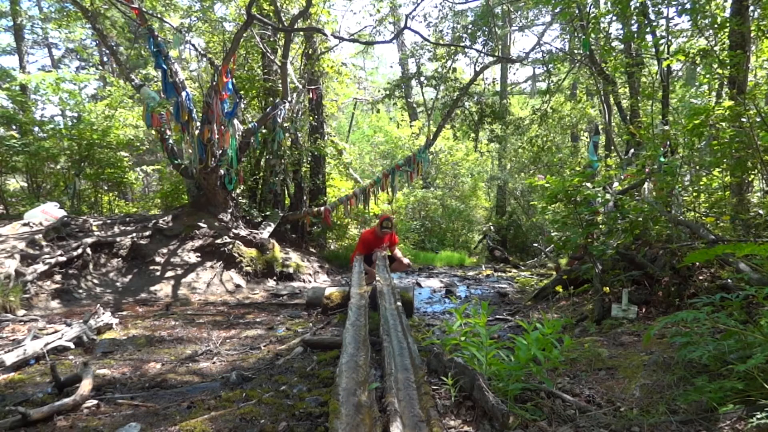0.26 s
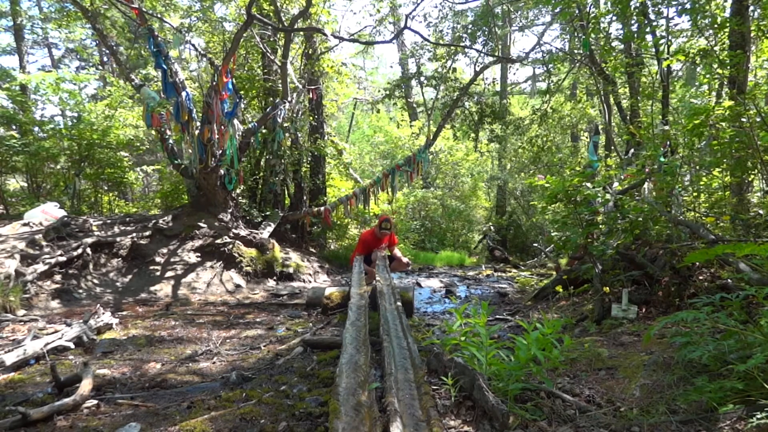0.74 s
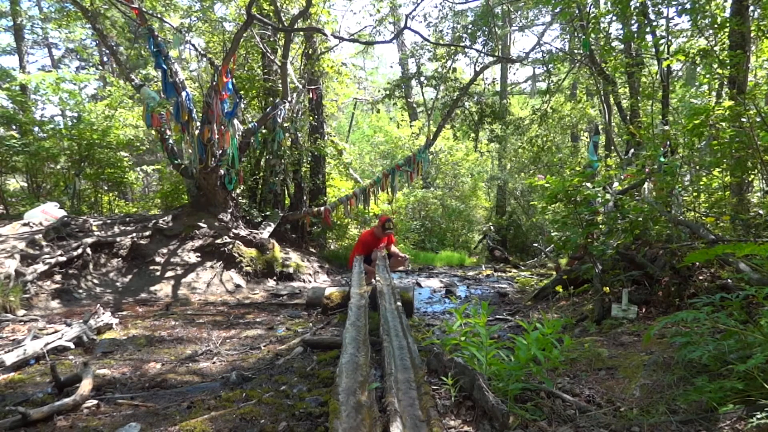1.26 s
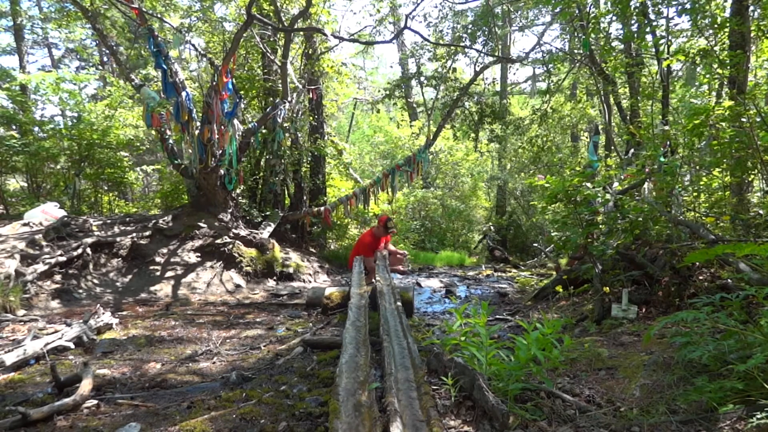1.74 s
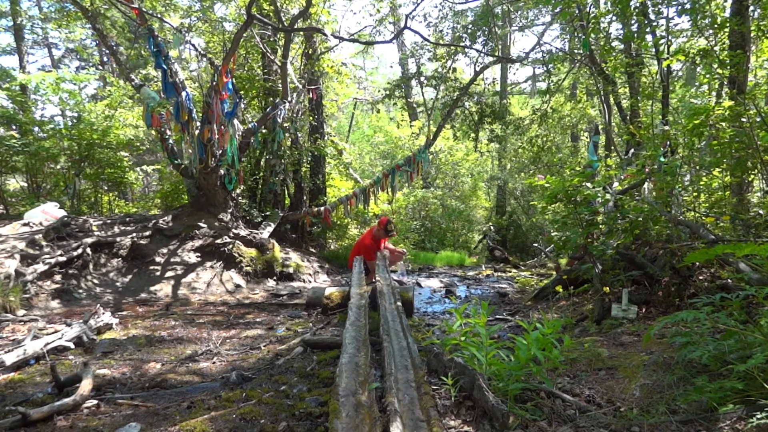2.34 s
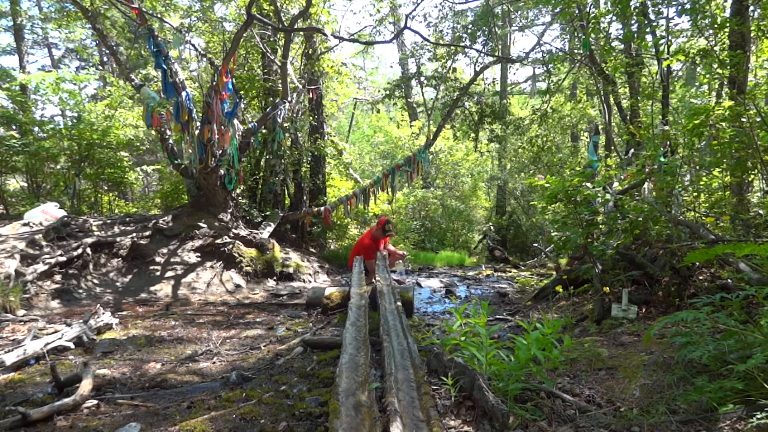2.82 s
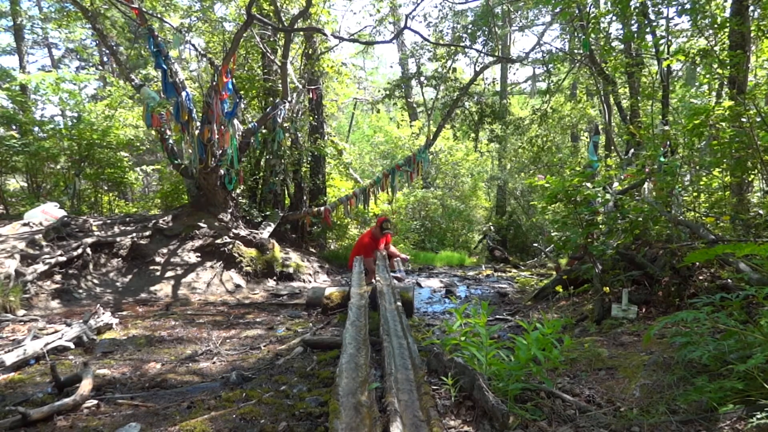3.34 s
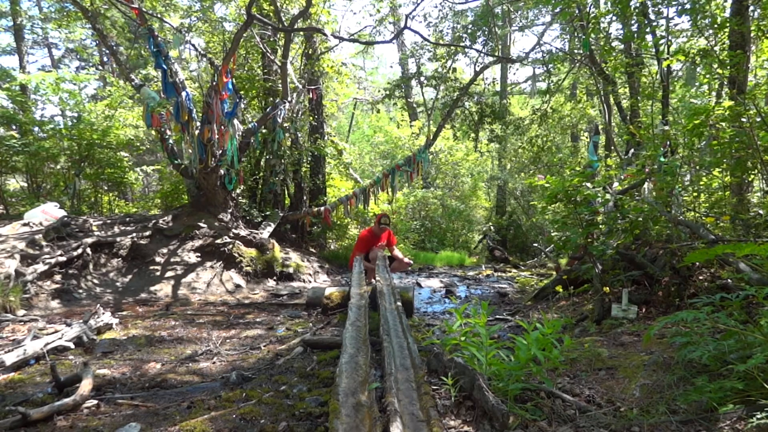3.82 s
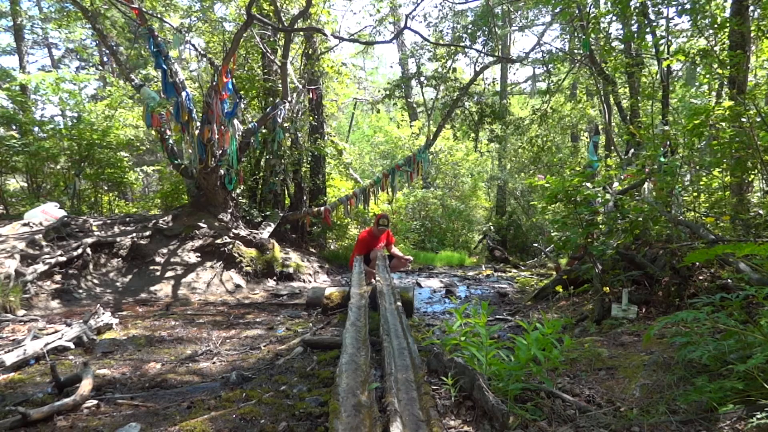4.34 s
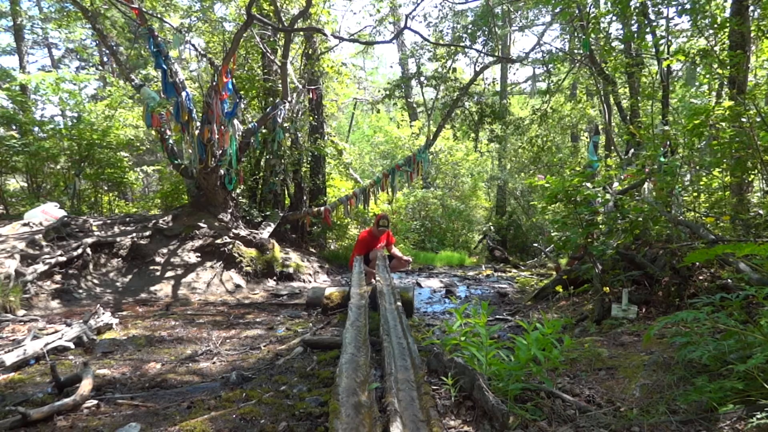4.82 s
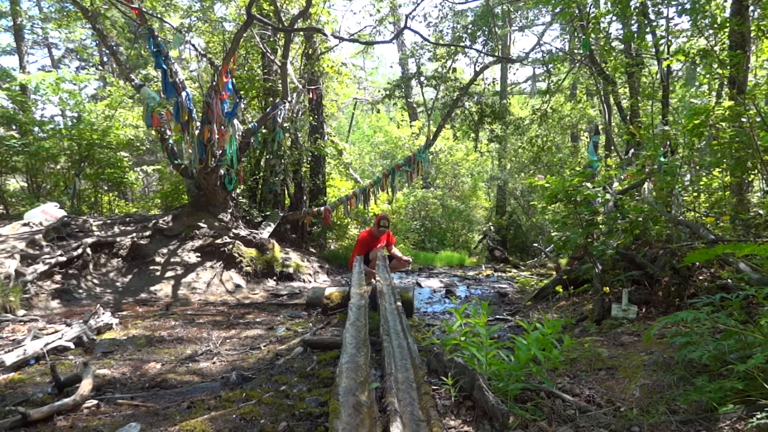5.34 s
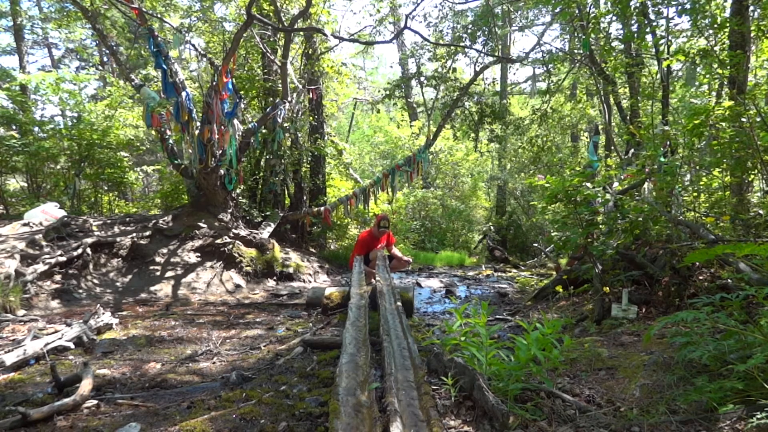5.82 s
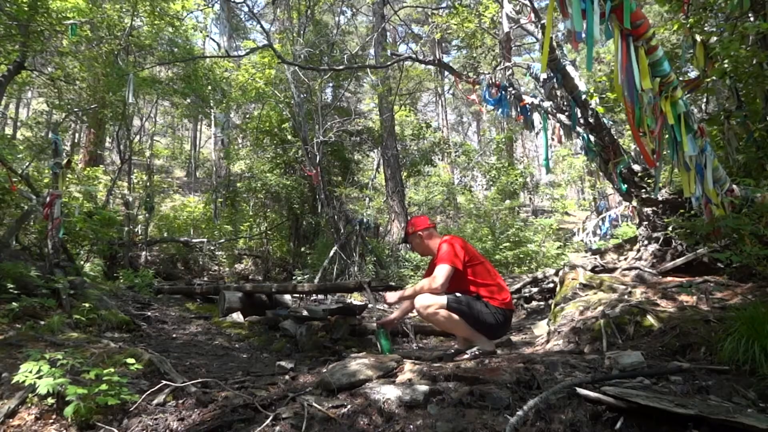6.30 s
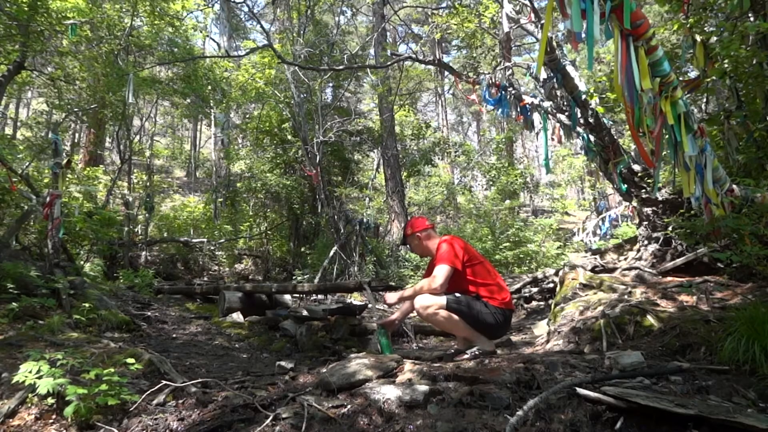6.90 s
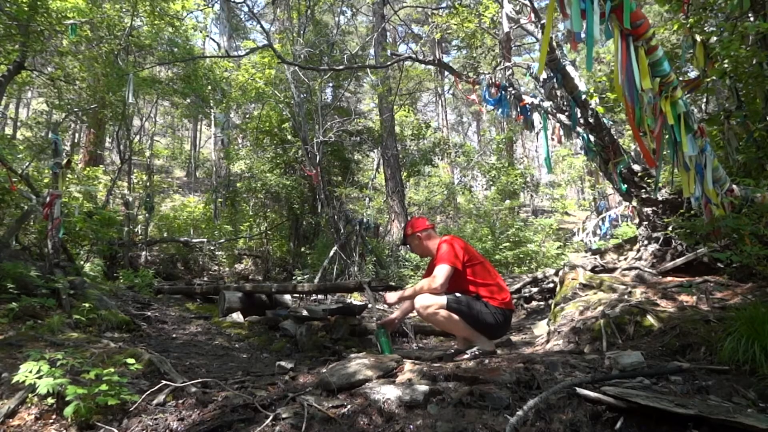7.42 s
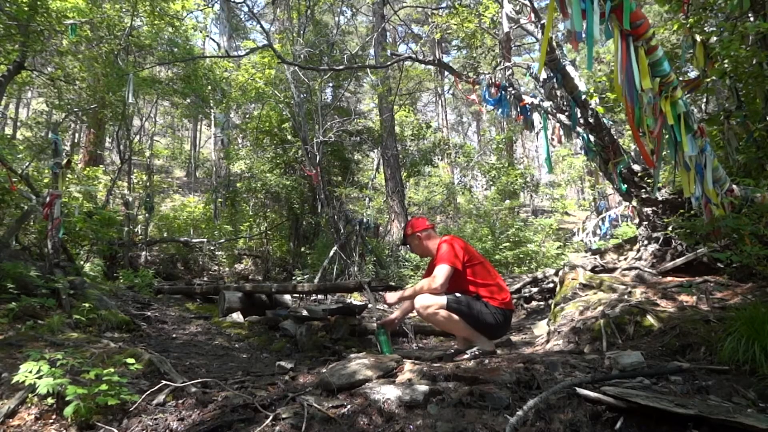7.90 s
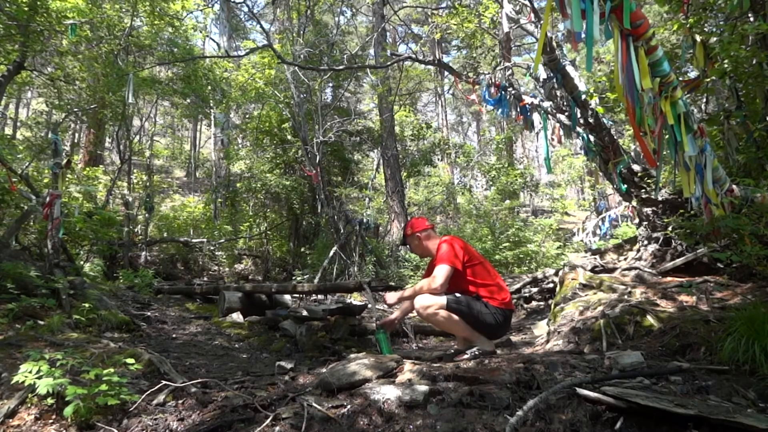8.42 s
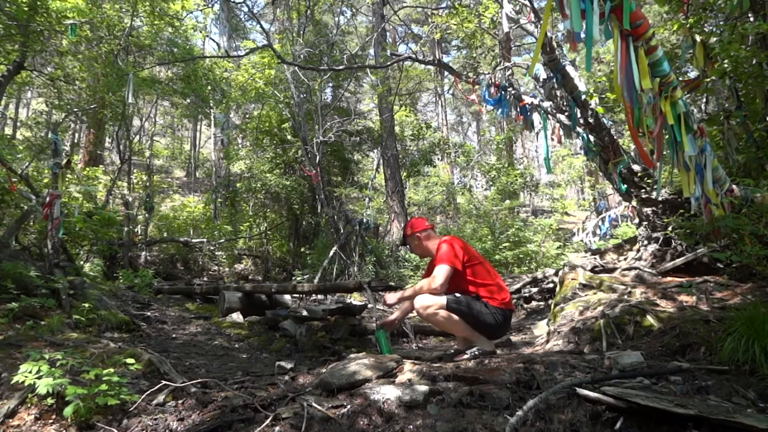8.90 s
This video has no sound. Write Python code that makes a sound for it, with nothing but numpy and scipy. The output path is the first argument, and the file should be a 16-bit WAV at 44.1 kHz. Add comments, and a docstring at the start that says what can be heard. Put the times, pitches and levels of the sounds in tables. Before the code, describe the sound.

A small forest spring trickles over stones a few steps away, with bubbling plinks, little splashes and ticking droplets, gurgling deeper for a while early on. Around six seconds the microphone is abruptly close: the water turns louder and denser, with crisp plops, and a thin stream fills a bottle with a faint hollow rising tone. Very faint low forest air lies beneath.

```python
"""A forest spring trickles over stones, at first a few steps away, gurgling more deeply from 1.4 to 4 s.
Trapped air bubbles ring as short swelling sines over a fine noise spray; drops slap with a pulse, a crack
and a patter, and tiny droplets tick. At 6.05 s the water is suddenly heard close by, louder and denser.
From then on a thin stream catches a bottle in spells, and from 8.4 s runs in steadily: a hollow band of
noise whose note climbs overall. A faint low rush of forest air lies beneath, swelling once after 1.5 s."""
import sys
import numpy as np
from scipy import signal
from scipy.fft import rfft, irfft, next_fast_len
from scipy.io import wavfile

SR = 44100
rng = np.random.default_rng(int(sys.argv[2]) if len(sys.argv) > 2 else 0)


def digitize_waveform(pressure):
    """Quantize a signal to 16-bit integers and store it at the path in sys.argv[1].

    Rows of a 2-D input are taken as channels; values are limited to [-1, 1].
    """
    field = np.atleast_2d(pressure).T
    bounded = np.clip(field, -1, 1)
    quanta = np.round(bounded * 32767).astype(np.int16)
    wavfile.write(sys.argv[1], SR, quanta)


N = 403505

# Swell and slackening of the flow. Each row: time in seconds, level change in dB.
FLOW = [(0, 2.5), (0.33, 0.3), (0.6, 1), (0.87, 1.5), (1.37, -1), (1.41, 1), (1.65, 1), (2.25, 0),
        (2.45, 2), (2.6, 0.3), (2.85, 1.7), (3.1, 1.2), (3.79, -0.2), (4.0, 1.2), (4.25, 0.5), (4.8, 1.5),
        (5.46, 0.3), (5.52, 1.3), (5.64, -0.3), (5.9, 1.2), (6.1, 0.07), (9.15, -0.17)]
# Tone of the water from afar, from afar while it gurgles deeply, and close by.
# Each row: frequency in Hz, relative gain in dB.
FAR_COLOUR = [(110, -40), (200, -17), (320, -13), (440, -10), (510, -8), (620, -3), (760, -7.5),
              (1080, -2.5), (1400, 1), (2200, 2), (2900, 4), (4800, 5), (7000, 4.5), (11000, 1)]
DEEP_COLOUR = [(110, -42.5), (200, -15), (315, -13.5), (400, -1.5), (510, -6), (600, -0.5), (830, -3.5),
               (1400, 5), (2000, 5), (3200, 4.5), (5000, 2.5), (11000, -1.5)]
NEAR_COLOUR = [(130, -29), (250, -15.5), (400, -11), (500, -12), (570, -7), (680, -3), (1060, -7.5),
               (1700, -5), (2400, -8), (3100, -6), (4700, -9.5), (6500, -10.5), (11000, -14.5)]
# Stretches of far, deeply gurgling and near water. Each row: start in seconds, end in seconds.
FAR_SPANS = [(0, 1.39), (4.03, 6.05)]
DEEP_SPANS = [(1.39, 4.03)]
NEAR_SPANS = [(6.05, 10)]
# Stereo width from afar, where more of the sound is scattered, and close by.
# Each row: frequency in Hz, gain on the side signal in dB.
FAR_WIDTH = [(50, -11), (190, -1.5), (620, -3), (1120, -3), (2000, -9.5), (3600, -11), (10000, -10.5)]
NEAR_WIDTH = [(190, -14), (350, -2.5), (620, -6.5), (1120, -8.5), (2000, -11), (3600, -12), (10000, -11)]
# Band levels before flow and wander: (gurgle dB, babble dB, spray dB)
FAR_DB, DEEP_DB, NEAR_DB = (-61.5, -53.4, -49.9), (-58, -51, -47.5), (-55, -45.5, -42.5)


def trickle():
    """Water comes in small surges that shed bubbles and spray; distance blurs the single blips."""
    surge = from_db(1.2 * drift(14) + 2.2 * drift(80))
    blips = swarm(per_s=2800, size_db=3.0, swell_cycles=1.86, surge=surge)
    spray = rng.standard_normal((2, N)) * surge ** 0.52
    spray = coloured(spray, [(300, 3.2), (1500, 4.2), (4000, 8.4), (9000, 8.7)])
    blurred = banks(blips, t60=0.088, wet_db=-2.5)
    far_mid, far_side = blurred + from_db(-1.0) * spray
    far = from_afar(stereo(far_mid, far_side, FAR_WIDTH))
    near_mid, near_side = blips + from_db(-0.5) * spray
    near = stereo(near_mid, near_side, NEAR_WIDTH)
    flow_db, = in_time(FLOW)
    out = 0
    for water, colour, spans, levels_db in ((far, FAR_COLOUR, FAR_SPANS, FAR_DB),
                                            (far, DEEP_COLOUR, DEEP_SPANS, DEEP_DB),
                                            (near, NEAR_COLOUR, NEAR_SPANS, NEAR_DB)):
        heard = during(spans)
        bands = gurgle_babble_spray(coloured(water, colour))
        # every band follows the flow and wanders a little on its own
        for band, db, wander_db in zip(bands, levels_db, (.45, .3, .3)):
            level = from_db(db + flow_db + wander_db * drift(10))
            out = out + heard * level * rms_one(band)
    return out


def gurgle_babble_spray(water):
    """Big, middling and small bubbles fall in three bands, split at 900 and 3500 Hz."""
    below_900, below_3500 = [
        signal.sosfiltfilt(signal.butter(4, hz, fs=SR, output="sos"), water) for hz in (900, 3500)]
    return below_900, below_3500 - below_900, water - below_3500


def swarm(per_s, size_db, swell_cycles, surge, count=56):
    """Countless bubbles, even in power per Hz, small ones more often; each has its own place: (mid, side)."""
    out, pitches = np.zeros((2, N)), np.geomspace(200, 11500, count)
    share = pitches ** .7 / np.sum(pitches ** .7)
    chance = np.cumsum(surge) / np.sum(surge)  # more bubbles in a strong surge
    for hz, part in zip(pitches, share):
        bubbles = int(per_s * part * N / SR) + 2
        when, size, sign, place = rng.random((3000, 4))[:bubbles].T
        height = from_db(size_db * np.minimum(-np.log(1 - size), 2.4)) * np.sign(sign - .5)
        blip = bubble(hz, swell_time(hz, swell_cycles), rise=.025)
        height = height * np.sqrt(hz / np.sum(height ** 2) / np.sum(blip ** 2))
        where = (np.searchsorted(chance, when)[:, None] + np.arange(len(blip))).ravel()
        for k, weight in enumerate((height, height * (2 * place - 1))):
            out[k] += np.bincount(where, np.outer(weight, blip).ravel(), N)[:N]
    return rms_one(out)


# Reflections off the ground and stones. Each row: delay in seconds, gain as a factor.
ECHOES = [(.0015, 0.043), (.0075, 0.14)]


def from_afar(x):
    """Early reflections comb the distant sound."""
    out = x.copy()
    for delay_s, gain in ECHOES:
        add(out, delay_s, gain * x)
    return out


# Single bubbles, from short ticks to ringing glugs.
# Each row: start in seconds, pitch in Hz, peak level in dB, swell time in seconds.
BUBBLES = [(0.3968, 444, -54.5, 0.0054), (0.5216, 1570, -45, 0.0026), (0.559, 970.0, -52.0, 0.005),
           (0.8506, 3340.0, -38, 0.0014), (0.8608, 5450, -40, 0.0009), (1.0391, 674, -51, 0.0024),
           (1.0995, 4040, -34, 0.0009), (1.1624, 3440, -34, 0.00041), (1.3257, 1740, -44, 0.0018),
           (1.3938, 4070, -38, 0.0009), (1.415, 3050, -43, 0.0012), (1.449, 3000, -44, 0.002),
           (1.53, 2100, -42, 0.0017), (1.6602, 420, -48.5, 0.0028), (1.8361, 4670, -39.5, 0.0009),
           (1.891, 1000, -44.5, 0.002), (1.966, 570, -43.5, 0.0023), (2.0603, 415, -47.5, 0.0024),
           (2.35, 695, -51, 0.0039), (2.49, 2000, -48, 0.005), (2.4153, 686, -42.5, 0.002),
           (2.6273, 540.0, -46, 0.0033), (2.7313, 563, -41, 0.0025), (2.777, 1600, -48, 0.005),
           (2.871, 1750, -42, 0.0025), (2.9056, 2300.0, -34, 0.00046), (2.9276, 3750, -27.5, 0.00044),
           (2.9943, 2900, -30, 0.00028), (3.2042, 815, -49, 0.005), (3.386, 1240, -44, 0.0027),
           (3.4469, 3340.0, -39, 0.0009), (3.4671, 2320, -44, 0.0014), (3.5113, 3940.0, -42, 0.0005),
           (3.9563, 3780.0, -39, 0.0005), (3.958, 503, -46, 0.003), (4.0575, 570.0, -43.5, 0.0016),
           (4.139, 780, -57, 0.0056), (4.177, 665, -48.5, 0.0045), (4.208, 626, -58, 0.006),
           (4.248, 746, -59, 0.0043), (4.346, 970, -54, 0.004), (4.4135, 1630, -44, 0.0019),
           (4.4267, 6200.0, -43, 0.0005), (4.4491, 840, -48, 0.0025), (4.4509, 3180, -33, 0.00036),
           (4.7831, 4770, -39, 0.0005), (4.8724, 410.0, -50, 0.0022), (4.9547, 2400.0, -44, 0.0028),
           (4.9994, 2580, -38.5, 0.0016), (5.314, 2520, -44, 0.002), (5.4030, 2270, -37, 0.0011),
           (5.4040, 3000, -37, 0.0015), (5.431, 520, -51.5, 0.0038), (5.4835, 1910, -43, 0.002),
           (5.5344, 3480.0, -42, 0.0016), (5.7093, 2830.0, -36, 0.0005), (5.8435, 600, -48.5, 0.0039),
           (5.9642, 590, -38, 0.0017), (6.1533, 1390, -37, 0.0028), (6.1947, 770, -37, 0.0024),
           (6.2157, 5600, -19.5, 0.00028), (6.2328, 2950.0, -30.5, 0.0014), (6.2406, 1246, -33.0, 0.0036),
           (6.252, 1200, -37, 0.003), (6.2757, 1300, -37, 0.0022), (6.287, 1450, -33, 0.0009),
           (6.3166, 2030, -33.5, 0.0028), (6.3538, 5710.0, -32, 0.00076), (6.3947, 3340.0, -32, 0.0016),
           (6.454, 580, -45, 0.0026), (6.481, 1270, -39, 0.0038), (6.4937, 3940.0, -31, 0.0009),
           (6.5, 1600, -29, 0.0024), (6.515, 1760, -40, 0.003), (6.5329, 5040.0, -33.5, 0.0005),
           (6.5878, 1045, -39.5, 0.0064), (6.653, 1920, -37, 0.0026), (6.755, 1560, -38, 0.0025),
           (6.7689, 707, -36.5, 0.003), (6.7778, 2400.0, -32, 0.0009), (6.7961, 1500, -35.0, 0.0028),
           (6.7966, 2650, -28, 0.0005), (6.8113, 3460, -34, 0.0016), (6.842, 350, -51, 0.004),
           (6.8497, 4500, -31.5, 0.0011), (6.9614, 1440, -35.5, 0.0025), (6.9796, 2860, -32, 0.0014),
           (7.035, 1000, -45, 0.0022), (7.1819, 4250, -29, 0.0005), (7.1937, 4460.0, -33, 0.0005),
           (7.2104, 600, -39.0, 0.0035), (7.2196, 4760, -18.5, 0.00026), (7.2495, 3820, -36.5, 0.0016),
           (7.2707, 1740, -31.5, 0.0016), (7.2919, 4650.0, -23, 0.00088), (7.3331, 3220, -32, 0.00055),
           (7.3513, 1870.0, -34, 0.0009), (7.3803, 1730, -21, 0.00075), (7.391, 1950, -25, 0.00071),
           (7.4224, 4570, -33.0, 0.0005), (7.47, 690, -41, 0.0048), (7.5735, 4900, -27.5, 0.0005),
           (7.5748, 2630, -33, 0.0016), (7.6077, 3230, -36, 0.0016), (7.6105, 2240, -40, 0.0024),
           (7.6115, 760.0, -35, 0.0011), (7.6384, 3280, -25, 0.00072), (7.7339, 3230, -32.0, 0.0009),
           (7.7781, 874, -39, 0.0034), (7.782, 347, -52, 0.0036), (7.8085, 2260, -33, 0.0009),
           (7.8112, 3600, -35, 0.0005), (7.9789, 5500, -29.5, 0.0005), (7.9792, 4000, -29, 0.0005),
           (8.032, 4460.0, -30.5, 0.0005), (8.0415, 2290, -30.5, 0.0005), (8.0539, 1040, -40.5, 0.0043),
           (8.0669, 4460.0, -36, 0.0009), (8.1021, 4500, -31, 0.0005), (8.209, 1800, -38, 0.0029),
           (8.2398, 2280, -36, 0.0016), (8.2575, 4460.0, -32, 0.0008), (8.2819, 3460, -28, 0.0006),
           (8.2925, 1700, -33, 0.0015), (8.3722, 795, -36.5, 0.0025), (8.5359, 747, -36, 0.0028),
           (8.553, 1860, -35, 0.0018), (8.5725, 810, -37, 0.0023), (8.6132, 846, -35, 0.0013),
           (8.694, 2810, -28, 0.0015), (8.704, 583, -46, 0.005), (8.7184, 2510, -35, 0.0016),
           (8.7254, 1190, -30.0, 0.0016), (8.802, 1380, -36, 0.002), (8.8147, 4230, -35, 0.0005),
           (8.9337, 1320, -29.5, 0.0021), (8.9359, 3530, -32.5, 0.0009), (9.0188, 1750, -32.5, 0.0016),
           (9.0641, 3240, -26, 0.0005)]


def plinks(follower_db=-15, rise=0.027):
    """Single bubbles, each with its own glide and place; a weaker, usually higher one follows each."""
    out = np.zeros((2, N))
    bubbles = np.vstack([BUBBLES,
                         lesser_bubbles(FAR_SPANS + DEEP_SPANS, per_s=70, level_db=-46.5),
                         lesser_bubbles(NEAR_SPANS, per_s=170, level_db=-38)])
    chances = rng.standard_normal((len(bubbles), 4))
    for (s, hz, db, swell_s), (step, glide, place, wait) in zip(bubbles, chances):
        gain = from_db(db) * np.array([[1], [np.tanh(place)]])  # mid and side
        own_rise = rise * np.exp(0.73 * np.clip(glide, -2, 2))
        add(out, s, gain * bubble(hz, swell_s, own_rise))
        follower_hz = hz * 1.05 * np.exp(0.073 * step)
        follower = bubble(follower_hz, swell_time(hz, cycles=2.2), rise)
        add(out, s + 0.0087 * np.exp(0.38 * wait), gain * from_db(follower_db) * follower)
    is_near = during(NEAR_SPANS)
    near = stereo(*banks(out * is_near, t60=0.15, wet_db=-9.0), NEAR_WIDTH)
    far = stereo(*banks(out * ~is_near, t60=0.1, wet_db=-5.0), FAR_WIDTH)
    return near + far


def lesser_bubbles(spans, per_s, level_db, low_hz=626, high_hz=6500, knee_hz=2050,
                   spread_db=3.5, fade_db_per_octave=5.5):
    """Chance bubbles, even over the octaves and fainter below the knee; rows like those of BUBBLES."""
    when, octave, size, damping = rng.random((2000, 4))[:int(per_s * N / SR)].T
    hz = low_hz * (high_hz / low_hz) ** octave
    fade_db = fade_db_per_octave * np.maximum(np.log2(knee_hz / hz), 0)
    db = level_db + spread_db * (2 * size - 1) - fade_db
    swell_s = swell_time(hz, cycles=0.87 + 1.8 * damping)
    rows = np.transpose([when * N / SR, hz, db, swell_s])
    return rows[during(spans)[(when * N).astype(int)]]


def bubble(hz, swell_s, rise):
    """A bubble swells as it pinches off, dies away and rises in pitch near the surface; height 1."""
    age = np.arange(int(9 * swell_s * SR)) / (swell_s * SR)  # in swell times
    envelope = age * np.exp(1 - age)
    cycles = hz * swell_s * age * (1 + rise * (age / 2 - 1.5))
    return envelope * np.sin(2 * np.pi * cycles)


def swell_time(hz, cycles):
    """Usual swell of a bubble in s; small bubbles ring for more cycles."""
    return cycles / hz * (hz / 1000) ** 0.55


# Drops slapping on the water, and a few low plops and gurgles near 250-560 Hz played the same way. Each row:
# start in seconds, relative level in dB, centre in Hz, patter t60 in seconds.
SLAPS = [(0.29, -39, 1900, 0.052), (0.291, -56, 370, .04), (0.89, -36.5, 2900, .07),
         (1.100, -34, 4500, 0.19), (1.394, -36.5, 3740, 0.29), (1.435, -42, 1700, 0.3),
         (1.466, -39.5, 1500, 0.2), (1.525, -35.5, 2230, 0.16), (1.533, -48.5, 483, 0.16),
         (1.965, -37.5, 2600, 0.073), (2.09, -37, 2600, .09), (2.185, -55, 250, 0.06),
         (2.307, -55.5, 260, 0.13), (2.402, -40.5, 1500, .08), (2.796, -39, 4100, .05),
         (2.803, -33.5, 3400, 0.073), (2.9276, -30.5, 3450, 0.088), (2.945, -48, 560, 0.06),
         (2.9944, -31.5, 2500, 0.075), (3.386, -42, 700, .08), (3.395, -38, 4200, .08),
         (3.469, -37, 2150, .09), (3.574, -41, 2200, .06), (3.741, -43, 430, 0.043),
         (3.742, -39.5, 750, 0.049), (3.742, -36.5, 2600, 0.09), (3.952, -32.5, 3150, 0.12),
         (4.425, -38, 6000, 0.09), (4.581, -39, 6800, .04), (4.782, -36.5, 3000, .05),
         (5.343, -45, 4200, .03), (5.403, -40, 2700, 0.085), (5.546, -37, 3000, 0.15),
         (5.556, -35.5, 3720, 0.15), (6.08, -36, 2100, .05), (6.213, -32, 2400, .04),
         (6.216, -23, 5650, .018), (6.588, -30, 1400, .1), (6.818, -30, 5400, .02),
         (7.382, -25.5, 3000, 0.025), (7.608, -30.5, 2810, 0.067), (7.64, -26.5, 2900, 0.031),
         (7.811, -29, 1700, 0.044), (8.721, -32, 2400, .06), (8.936, -33, 5200, .02),
         (9.0641, -30, 3100, .08), (9.126, -34, 6600, .03)]


def slaps(impact_db=1.0, crack_t60=0.008, crack_db=-4, patter_db=-8.0, level_db=-3.0, droplets_per_s=1100):
    """A drop hits the surface with one sharp pulse and a crack, then its droplets patter down one by one."""
    out, t = np.zeros((2, N)), np.arange(SR // 5) / SR
    for s, db, hz, t60 in np.vstack([SLAPS, lesser_splashes(FAR_SPANS + DEEP_SPANS)]):
        band = [hz / 1.47, hz * 1.41]
        impact = butter(1.0 * (t == 0), band, "band")
        add(out[0], s, from_db(db + impact_db) * impact / np.abs(impact).max())
        crack = from_db(crack_db - 60 * t / crack_t60)
        patter = from_db(patter_db - 60 * t / t60)
        landing = rng.random(len(t)) < droplets_per_s / SR
        droplets = rms_one(landing * rng.uniform(-0.95, 1, (2, len(t))))
        burst = crack * rng.standard_normal((2, len(t))) + patter * droplets
        burst = rms_one(butter(burst, band, "band", order=3))
        add(out, s, from_db(db + level_db) * burst * np.sqrt(np.mean((crack + patter) ** 2)))
    return stereo(*banks(out, t60=0.09, wet_db=-3.5), NEAR_WIDTH)


def lesser_splashes(spans, per_s=14, level_db=-42.5, spread_db=2.5, low_hz=1500, high_hz=7000, t60_s=0.084):
    """Small splashes at chance times, the louder ones pattering longer; rows like those of SLAPS."""
    when, size, octave = rng.random((600, 3))[:int(per_s * N / SR)].T
    hz = low_hz * (high_hz / low_hz) ** octave
    db = level_db + spread_db * (2 * size - 1)
    rows = np.transpose([when * N / SR, db, hz, t60_s * (.5 + size)])
    return rows[during(spans)[(when * N).astype(int)]]


def ticks(per_s=50, size_db=1.5, far_db=-65, near_db=-55.5):
    """Tiny droplets land as sharp, bright ticks, louder close by and when the flow is strong."""
    flow_db, = in_time(FLOW)
    landing = rng.random(N) < per_s / SR
    clicks = landing * from_db(size_db * np.minimum(rng.exponential(1, N), 3))
    level = from_db(flow_db + np.where(during(NEAR_SPANS), near_db, far_db))
    mid = rms_one(butter(clicks, [3500, 10500], "band")) * level
    return stereo(mid, mid * drift(30), NEAR_WIDTH)


# Air in the bottle. Each row: time in seconds, resonance in Hz.
BOTTLE_NOTE = [(6.05, 161), (7.0, 166), (7.9, 185), (8.35, 182), (8.7, 259), (9.15, 280)]
# The stream catches the bottle's mouth in short spells.
# Each row: middle in seconds, length in seconds, relative level in dB.
BOTTLE_SPELLS = [(6.134, 0.095, -61), (6.73, 0.15, -60), (7, 0.065, -62), (7.68, 0.26, -64),
                 (7.885, 0.15, -59.5), (8.275, 0.21, -65)]


def bottle(steady_from_s=8.4, steady_rise_s=0.22, steady_db=-65.5, width_hz=32, level_db=-1):
    """The stream drums on the air in the bottle; as that air space shrinks, its note climbs overall."""
    t, (hz,) = np.arange(N) / SR, in_time(BOTTLE_NOTE)
    drumming = sum(from_db(db) * np.exp(-(2 * (t - s) / length) ** 2) for s, length, db in BOTTLE_SPELLS)
    steady = np.clip((t - steady_from_s) / steady_rise_s, 0, 1)
    drumming = drumming + from_db(steady_db) * steady
    # noise turned down to 0 Hz, low-passed and turned back rings in a band that follows the note
    turn = np.exp(2j * np.pi * np.cumsum(hz) / SR)
    ringing = (butter(rng.standard_normal((2, N)) / turn, width_hz, "low") * turn).real
    ringing = butter(ringing, 134, "high", order=6)
    return stereo(*rms_one(ringing), NEAR_WIDTH) * from_db(level_db) * drumming


# Low rush of the forest air. Each row: frequency in Hz, relative gain in dB.
AIR_COLOUR = [(20, -10), (50, -15), (90, -2.5), (120, 7), (200, -2), (400, -26)]


def forest_air(air_db=-84.5, waver_db=2, swell_s=1.5, attack_s=0.071, swell_db=-75):
    """A faint low rush of noise wavers under everything, with one brief swell that dies away."""
    age = np.maximum(np.arange(N) / SR - swell_s, 0) / attack_s
    swell = from_db(swell_db) * age * np.exp(1 - age)
    level = from_db(air_db + waver_db * drift(3.3)) + swell
    rush = stereo(*rng.standard_normal((2, N)), FAR_WIDTH)
    return level * rms_one(coloured(rush, AIR_COLOUR))


def banks(x, t60, wet_db):
    """Stones, banks and trunks scatter a short tail, different in mid and side."""
    t = np.arange(SR // 4) / SR
    echoes = rng.standard_normal((2, len(t))) * from_db(-60 * t / t60) * (t > .003)
    echoes /= np.sqrt(np.sum(echoes ** 2, axis=1, keepdims=True))
    return x + from_db(wet_db) * signal.oaconvolve(np.atleast_2d(x), echoes, axes=1)[:, :N]


def stereo(mid, side, width):
    """Left and right from mid and side, the side coloured by a width table."""
    return mid + coloured(side, width) * np.array([[1], [-1]])


def coloured(x, points):
    """Give a sound the gains of a (Hz, dB) table."""
    size = next_fast_len(N, True)
    hz, db = np.transpose(points)
    bins_hz = np.arange(size // 2 + 1) * SR / size
    gain = from_db(np.interp(np.log(bins_hz + 1), np.log(hz), db))
    return irfft(rfft(x, size) * gain, size)[..., :N]


def butter(x, hz, kind, order=2):
    """Butterworth filter."""
    return signal.sosfilt(signal.butter(order, np.clip(hz, 10, .45 * SR), kind, fs=SR, output="sos"), x)


def drift(rate_hz):
    """Slow chance of rms 1: noise low-passed twice at rate_hz, drawn every 40 samples."""
    r = np.exp(-80 * np.pi * rate_hz / SR)
    noise = rng.standard_normal(N // 40 + 2002)
    slow = signal.lfilter([1], [1, -2 * r, r * r], noise)[2000:]  # skip the filter's start
    return np.interp(np.arange(N) / 40, np.arange(len(slow)), rms_one(slow))


def during(spans):
    """True inside the given (from s, to s) spans."""
    t = np.arange(N) / SR
    return np.any([(t >= start) & (t < end) for start, end in spans], axis=0)


def in_time(rows):
    """Each column of a curve at every sample."""
    s, *columns = np.transpose(rows)
    return [np.interp(np.arange(N) / SR, s, c) for c in columns]


def add(out, s, sound):
    """Mix a sound in from time s on."""
    at = int(np.clip(s * SR, 0, N - 1))
    out[..., at:at + sound.shape[-1]] += sound[..., :N - at]


def from_db(db):
    """Decibels to gain."""
    return 10 ** (np.asarray(db) / 20)


def rms_one(x):
    """Scale to rms 1."""
    return x / np.sqrt(np.mean(x ** 2) + 1e-20)


def scene():
    """The spring lies a touch to the left from afar and a touch to the right close by."""
    left_over_right_db = np.where(during(NEAR_SPANS), -.55, .4)
    water = trickle() + plinks() + slaps() + ticks() + bottle()
    return water * from_db(left_over_right_db * np.array([[.5], [-.5]])) + forest_air()


def record(dry):
    """The top is cut steeply above 11080 Hz."""
    return signal.sosfilt(signal.ellip(16, .1, 80, 11080, fs=SR, output="sos"), dry)


dry = scene()
out = record(dry)
digitize_waveform(out)
```